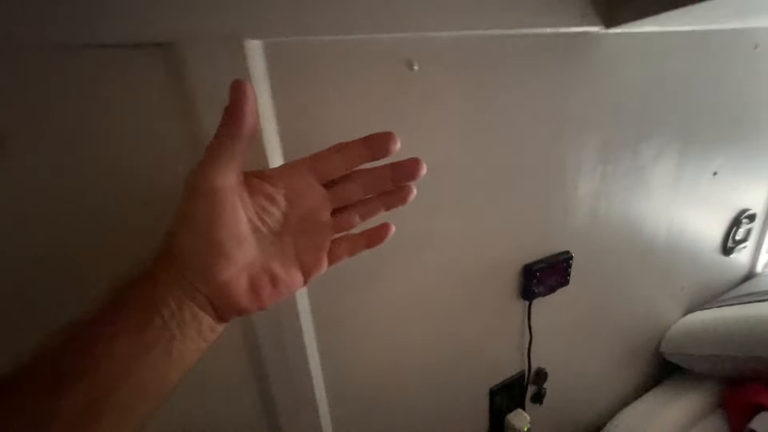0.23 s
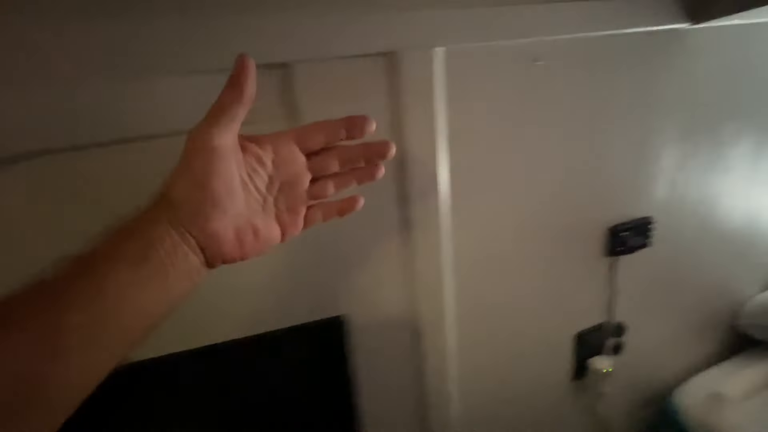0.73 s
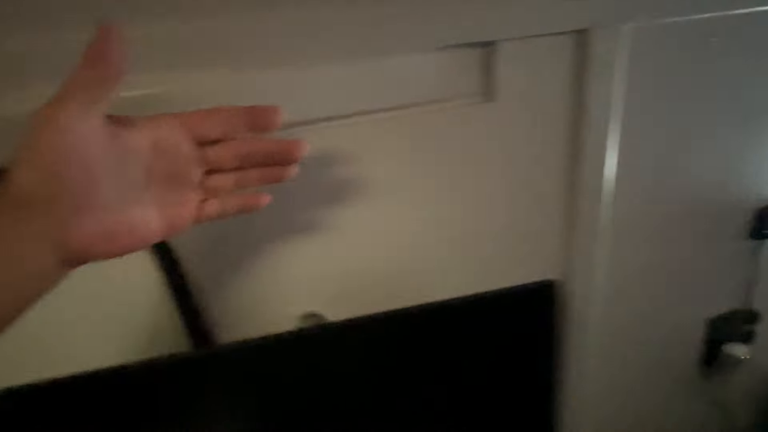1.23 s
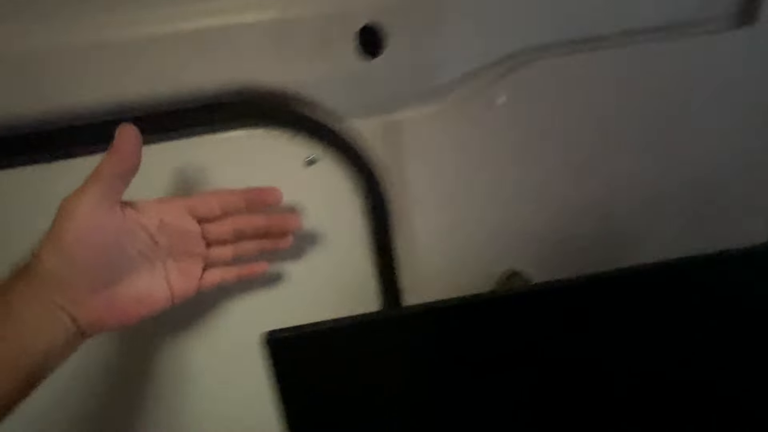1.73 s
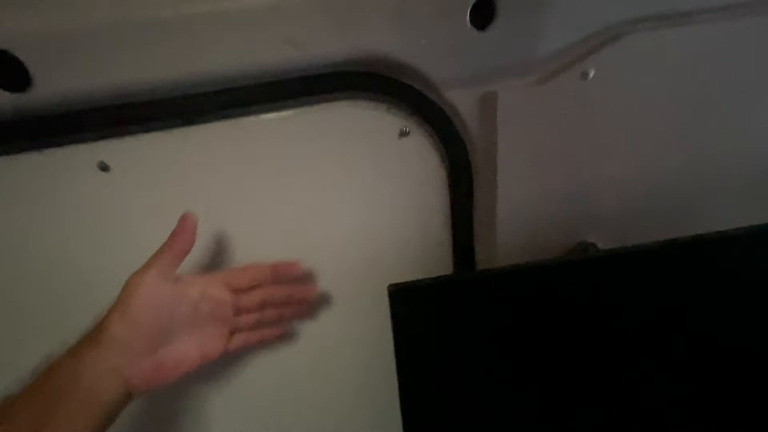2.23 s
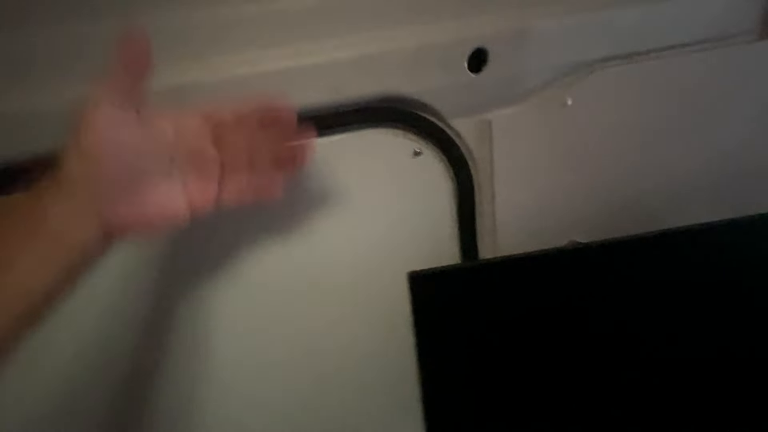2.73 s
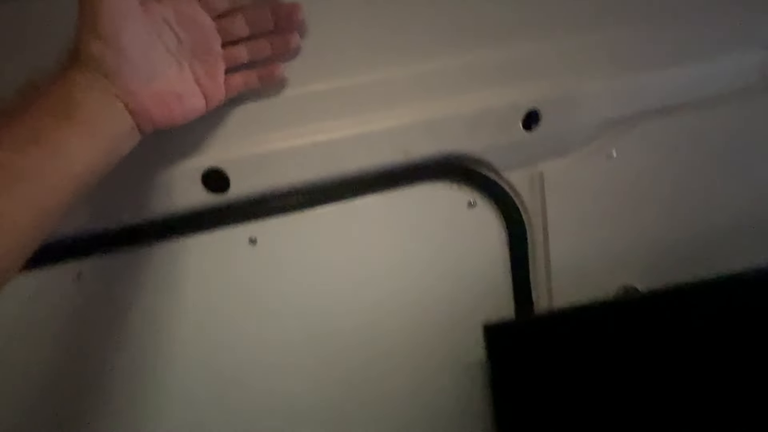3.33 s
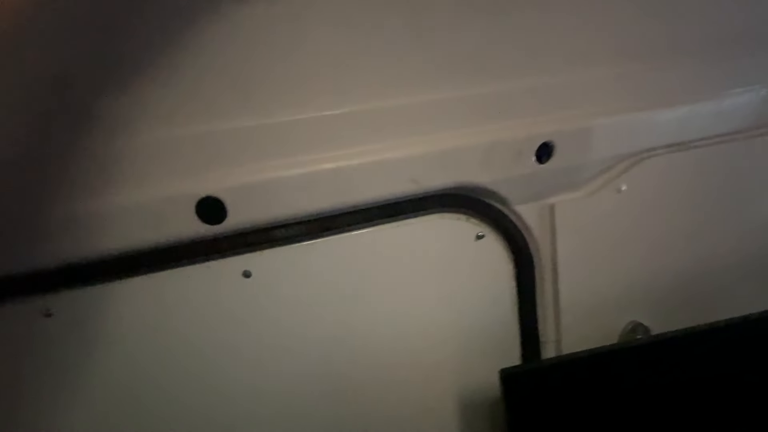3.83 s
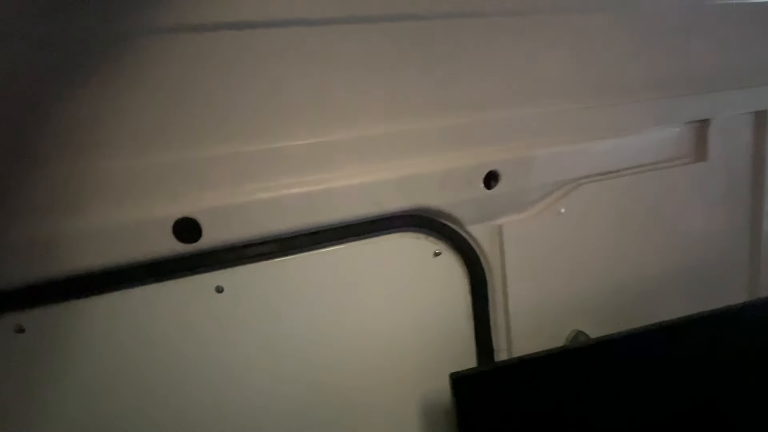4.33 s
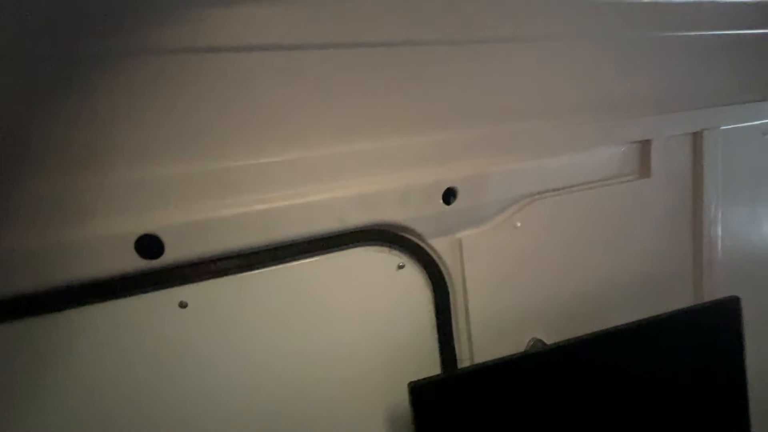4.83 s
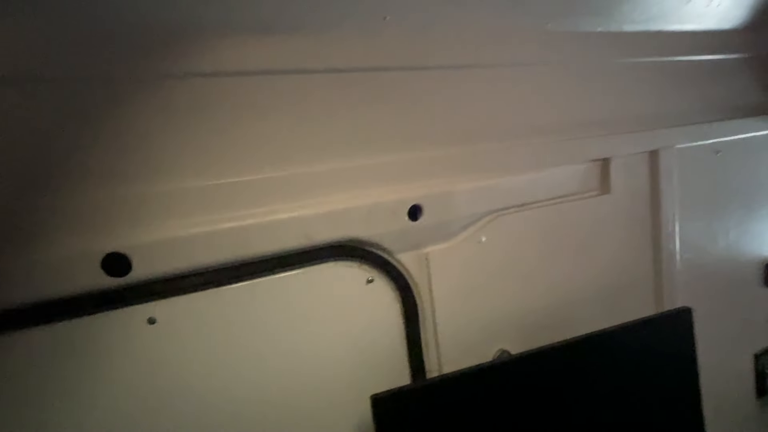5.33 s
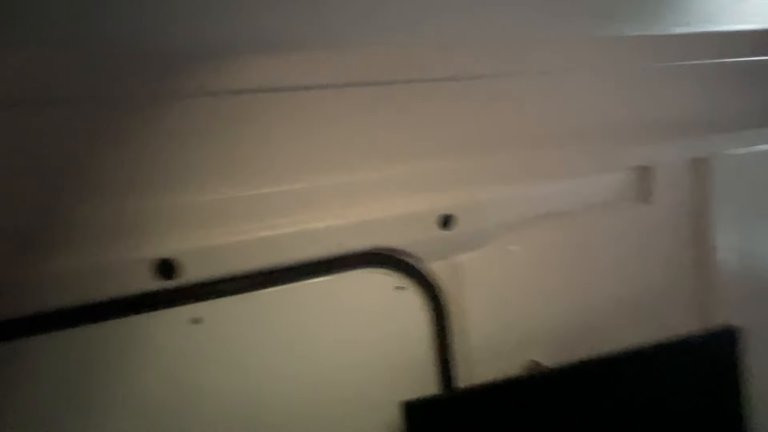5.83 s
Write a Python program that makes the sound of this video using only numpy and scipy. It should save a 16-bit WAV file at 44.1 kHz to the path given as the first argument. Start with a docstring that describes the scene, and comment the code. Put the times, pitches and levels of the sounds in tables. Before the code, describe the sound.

Inside a small hard-walled vehicle cabin, an air conditioner blows continuously with a low, slightly boxy rush. Beneath it a small engine outside throbs fast and deep, with wavering mains and compressor hum. A handheld microphone swings round over the first few seconds, so the hum changes color and shifts between sides. Brief soft cloth rubs come close by, clearest near one second.

```python
"""A small engine throbs outside a hard-walled cabin into which the air conditioner it powers blows.
The throb is a set of multiples of the firing rate, standing as clean tones that swell and shift sides
as the hand-held microphone turns. On top lie a low cabin boom (resonated noise), wavering mains, fan and
compressor tones, fan air (banded noise with wall echoes and resonances) and close cloth rustles (noise swells)."""
import sys
import numpy as np
from scipy import signal
from scipy.io import wavfile

SR = 44100
rng = np.random.default_rng(int(sys.argv[2]) if len(sys.argv) > 2 else 0)


def ratio(d):
    """dB to gain"""
    e = np.asarray(d, float) / 20
    return 10 ** e


def master_out(mix):
    """Clip the mix to full scale and print it as 16-bit PCM to the path in sys.argv[1]."""
    frames = np.transpose(np.atleast_2d(mix))
    ceiling = np.clip(frames, -1, 1)
    pcm = np.round(ceiling * 32767).astype(np.int16)
    wavfile.write(sys.argv[1], SR, pcm)


N = 267598
TIME = np.arange(N) / SR

# Microphone headings at which levels are given: 0 = start, 1 = sweeping, 2 = pausing, 3 = at rest.
HEADINGS = (0, 1, 2, 3)
# Stereo lean. Each row: frequency in Hz, left minus right in dB.
LEAN = [(60, -12), (130, 10.5), (270, -2.5), (590, 3.5), (1260, 2), (2680, 0.5), (5740, 11.5),
        (12300, -5.5)]


def rms_one(x):
    """Scale to unit rms."""
    return x / np.sqrt(np.mean(x ** 2) + 1e-20)


def at_hz(points, hz):
    """Read a spectrum table on a log-frequency axis."""
    table_hz, value = np.transpose(points)
    return np.interp(np.log(hz), np.log(table_hz + 1e-9), value)


def drift(rate_hz):
    """Slow random wander of spread 1: noise through two equal poles at rate_hz."""
    step = 40   # samples between drawn points
    r = np.exp(-2 * np.pi * rate_hz * step / SR)
    noise = rng.standard_normal(N // step + 2002)
    slow = signal.lfilter([1], [1, -2 * r, r * r], noise)[2000:]
    return np.interp(np.arange(N) / step, np.arange(len(slow)), rms_one(slow - slow.mean()))


def sides(pan_db):
    """Left and right gains for a level difference, left minus right."""
    return ratio(np.array([pan_db / 2, -pan_db / 2]))


def bands(low_hz, count):
    """Third-octave bands of stereo noise, each with its likeness and lean; yields centre and band."""
    # Each row: frequency in Hz, left-right likeness (1 = same, 0 = unrelated, -1 = inverted).
    likeness = [(60, 0.81), (170, -0.19), (500, -0.09), (1460, -0.12), (4240, -0.03), (12300, 0.041)]
    edges_hz = low_hz * 2 ** (np.arange(count + 1) / 3)
    white = rng.standard_normal((2, 2, N + 8192))   # neighbouring bands use different noise
    for k in range(count):
        sos = signal.butter(2, edges_hz[k:k + 2], "band", fs=SR, output="sos")
        mid, side = signal.sosfilt(sos, white[k % 2])[:, -N:]
        centre_hz = np.sqrt(edges_hz[k] * edges_hz[k + 1])
        alike = np.clip(at_hz(likeness, centre_hz), -.99, .99)
        pair = np.sqrt(1 + alike) * mid + np.sqrt(1 - alike) * side * [[1], [-1]]
        yield centre_hz, pair * sides(at_hz(LEAN, centre_hz))[:, None]


def engine(turn):
    """Regular firings heard as multiples of the firing rate; a wall resonance makes those above it lag."""
    # Each row: multiple of firing rate, rms dB at headings 0, 1, 2, left minus right dB at headings 0, 1, 2.
    orders = [(1, -67, -59, -49, -2, -2, 3), (3, -40, -31.5, -27, -3.5, 6.5, 1),
              (4, -31, -42.5, -46, -2.5, -11, 2), (5, -62, -46, -42.5, -9, 3, 17),
              (6, -32, -30.5, -34, 8.5, -2, -5.5), (7, -45.5, -29.5, -32, 18.5, -1, -6.5),
              (8, -53, -33.5, -36.5, 5, 4, -5), (9, -34.5, -43, -48.5, 4, -1, 16),
              (10, -67, -46, -49.5, 7, 4, -10), (11, -53, -47, -42, -27, 14, 3.5),
              (12, -57, -59, -65.5, -3, -11, -6), (13, -65, -57, -64.5, 5, -15, 2),
              (14, -57, -56, -57.5, 9, -15, 8), (15, -55, -55, -57.5, 2, -15, -12),
              (17, -53.5, -60.5, -64, 0, 5, 2), (18, -60, -52.5, -57.5, 0, 0, 1)]
    # Multiples heard on the far side of a pressure node, inverted.
    beyond_node = (5, 9, 10)
    # Second multiple: rms level in dB at headings 0-3.
    second_level_db = [-26, -28, -29, -27.5]
    # Second multiple: left minus right in dB at headings 0, 1, 2.
    second_pan_db = [-4, -4, -0.5]
    # Brief dips where the low boom and the second multiple partly cancel.
    # Each row: centre in seconds, depth in dB (negative = rise), half length in seconds.
    cancellations = [(.25, -0.5, 0.084), (1.054, 8, 0.092), (1.696, 12, 0.097), (2.04, 29, .05),
                     (2.6, 16, 0.3), (2.92, -1, .04), (3.158, 8, .04), (3.337, 25, 0.071), (3.652, 12, .06),
                     (4.357, 24, 0.19), (4.87, 20, .05), (5.287, 6, 0.2), (5.77, 8, 0.1)]
    firings_per_s, first_firing_s = 24.25, .0183
    wall_hz, wall_width_hz = 74.7, 31

    angle = 2 * np.pi * firings_per_s * (TIME - first_firing_s)
    angle = angle + 0.099 * drift(1.44)   # the governor hunts a little
    cancelled_db = sum(db * np.exp(-((TIME - s) / half_s) ** 2) for s, db, half_s in cancellations)
    second_db = np.interp(turn, HEADINGS, second_level_db) - cancelled_db
    second_sides = sides(np.interp(turn, [0, 1, 2], second_pan_db))
    out = -np.sqrt(2) * ratio(second_db) * np.cos(2 * angle) * second_sides

    effort_db = 0.62 * drift(17)   # firings differ a little in strength
    for k, *heard in orders:
        hz = k * firings_per_s
        height = np.interp(turn, [0, 1, 2], ratio(np.array(heard[:3])))
        height = height * ratio(effort_db + 0.89 * drift(7.6))
        lag_rad = np.arctan2(wall_width_hz * hz, wall_hz ** 2 - hz ** 2) + np.pi * (k in beyond_node)
        # the two ports sit at different points of the wave
        apart_rad = np.array([[.1], [-.1]]) * (1 + .5 * drift(0.33))
        tone = np.sqrt(2) * height * np.cos(k * angle - lag_rad + apart_rad)
        out += tone * sides(np.interp(turn, [0, 1, 2], heard[3:]))
    return out


def rumble():
    """Air turbulence booms in a low cabin resonance, alike at both ports but for level."""
    boom_hz, width_hz, level_db = 45.7, 3.4, -44
    r, w = np.exp(-np.pi * width_hz / SR), 2 * np.pi * boom_hz / SR
    boom = rng.standard_normal(N + SR)
    for _ in range(2):
        boom = signal.lfilter([1, 0, -1], [1, -2 * r * np.cos(w), r * r], boom)
    return ratio(level_db) * rms_one(boom[SR:]) * sides(-1.5)[:, None]


def motors(turn):
    """Motor, mains and fan tones that waver in level and phase; the high ones reach the ports out of step."""
    # Tone frequencies in Hz.
    tones_hz = [57.6, 60.01, 104.4, 120.03, 208.7, 391.0, 782.2, 2997, 3055, 6052, 6110, 6168]
    # Each row, one per tone: rms dB at headings 0-3, waver in dB, phase jitter in rad.
    tones = [(-47, -46, -46.5, -43.5, 7.2, 0.26), (-66, -53, -58, -56, 2.0, 0.083),
             (-36, -49.5, -43.5, -42, 4.7, 0.081), (-46, -45, -42.5, -42.5, 1.9, 0.1),
             (-53, -51.5, -49.5, -50, 2.7, 0.14), (-55.5, -52.5, -52, -50, 2.7, 0.74),
             (-57, -51, -49, -52, 3.0, 1.2), (-79, -77, -80, -66, 3.0, 2.7),
             (-61, -61.5, -62, -61, 2.2, 1.26), (-78, -79, -81, -81, 2.6, 2.2),
             (-77, -73, -76, -80, 3.0, 2.3), (-72, -80, -82, -69, 3.0, 2.5)]
    port_lead_s = np.array([[0], [.0003]])   # right ahead of left
    out = np.zeros((2, N))
    for hz, (*heard_db, waver_db, jitter_rad) in zip(tones_hz, tones):
        level_db = np.interp(turn, HEADINGS, heard_db) + waver_db * drift(5.1)
        angle = 2 * np.pi * (hz * (TIME + port_lead_s) + rng.random()) + jitter_rad * drift(3.05)
        out += np.sqrt(2) * ratio(level_db) * np.cos(angle) * sides(at_hz(LEAN, hz))[:, None]
    return out


def cabin(x, turn):
    """One source reaches each port by dense wall echoes, another set at every heading; they comb the spectrum."""
    t60_s = 0.11
    age_s = np.arange(SR // 4) / SR
    echoes = rng.standard_normal((4, 2, len(age_s))) * ratio(-60 * age_s / t60_s)
    out = 0
    for heading, pair in zip(HEADINGS, echoes):
        near = np.cos(np.pi / 2 * np.clip(turn - heading, -1, 1))
        pair = pair / np.sqrt(np.sum(pair ** 2, axis=1, keepdims=True))
        out = out + near * signal.oaconvolve(x[None], pair, axes=1)[:, len(x) - N:len(x)]
    return out


def air(turn):
    """Turbulent fan noise, slightly patchy; the resonances stand out more or less with the heading."""
    # Spectrum shape. Each row: frequency in Hz, relative density in dB per Hz.
    spectrum = [(30, -50), (50, -25.5), (65, -26), (90, -32), (160, -18.5), (250, -9), (300, -14.5),
                (500, -12), (600, -13.5), (750, -11.5), (1200, -13), (2300, -25.5), (3000, -24.5),
                (4200, -30.5), (8000, -32.5), (13000, -41.5)]
    # Duct and cabin resonances. Each row: frequency in Hz, width in Hz, lift in dB at headings 0-3.
    resonances = [(241, 37, 2, 7.5, 9, 7), (375, 44, 2.5, -1, 1, 7.5), (433, 34, -0.5, 5.5, 2.5, -0.5),
                  (500, 34, 8, 7.5, 5.5, 4), (711, 48, 7, 8, 4.5, 10), (956, 86, 2.5, 3.5, 1, 1.5),
                  (1094, 120, -1, 3.5, 1, -4), (1650, 250, 0, 4, 1.5, 5), (1970, 190, 8, 2, 3.5, 0.5),
                  (3030, 430, 2, 3, 1, 2), (6200, 220, 0, -2, 2, 0), (10700, 1900, 1, 1, 2, 4)]
    # Air level in dB at headings 0-3.
    air_level_db = [-36.5, -36.5, -36, -35]
    cabin_share = 0.58   # power share of the middle band that comes by the walls

    together = drift(0.94)
    out = 0
    for hz, band in bands(29.88, count=27):
        band_db = at_hz(spectrum, hz) + 0.43 * together + .5 * drift(3.6) + 0.93 * drift(11.4)
        out = out + ratio(band_db) * band

    middle = signal.sosfilt(signal.butter(2, [330, 2600], "band", fs=SR, output="sos"), out)
    source = np.r_[middle[1, -SR // 4:], middle[1]]   # the fan was already running
    out = out + (np.sqrt(1 - cabin_share) - 1) * middle + np.sqrt(cabin_share) * cabin(source, turn)

    for hz, width_hz, *lift_db in resonances:
        r, w = np.exp(-np.pi * width_hz / SR), 2 * np.pi * hz / SR
        peak = signal.lfilter([(1 - r * r) / 2, 0, (r * r - 1) / 2], [1, -2 * r * np.cos(w), r * r], out)
        gain = ratio(np.interp(turn, HEADINGS, lift_db) + 0.44 * drift(3.7))
        out = out + (gain - 1) * peak
    return ratio(np.interp(turn, HEADINGS, air_level_db)) * rms_one(out)


def rustles():
    """Cloth rubs close by: short swells of grainy noise, each tilted by its brightness."""
    # Each row: peak in seconds, relative level in dB, rise in seconds, brightness in dB per octave about 6 kHz.
    swell_rows = [(.62, -64.5, 0.064, 5), (.84, -55, 0.034, 1), (1.135, -47, 0.022, -2.5),
                  (1.57, -70, .02, 1.5), (1.72, -62, 0.024, 4), (2.385, -52, .014, -3.5),
                  (2.63, -56, 0.016, -5.5), (2.98, -55.5, 0.014, 1), (3.21, -56.5, 0.041, -0.5),
                  (3.49, -61.5, 0.033, 3), (4.42, -61, 0.031, -0.5), (4.97, -68, .03, 8),
                  (5.57, -58, .014, -1), (6.06, -52.5, 0.13, -2.5)]
    # Rubbing spectrum. Each row: frequency in Hz, relative density in dB per Hz.
    cloth = [(2000, -1.5), (3200, 1.5), (4400, 4), (5200, 1), (8000, 5), (11000, 4), (13000, -24)]
    fall_per_rise = 2.03   # a rustle fades slower than it comes

    grain = ratio(2.0 * drift(33) + 0.99 * drift(150))
    swells = []
    for peak_s, db, rise_s, _ in swell_rows:
        span_s = np.where(TIME < peak_s, rise_s, fall_per_rise * rise_s)
        swells.append(ratio(db) * np.exp(-np.abs((TIME - peak_s) / span_s) ** 1.27))
    out = 0
    for hz, band in bands(1895, count=9):
        tilts = [ratio(row[3] * np.log2(hz / 6000)) for row in swell_rows]
        band_db = at_hz(cloth, hz) + 7.5 + 1.75 * drift(33)
        out = out + ratio(band_db) * np.dot(tilts, swells) * band
    return grain * out


def scene():
    """Engine throb, cabin boom, motor tones, air and rustles."""
    # Microphone turn. Each row: time in seconds, heading (0-3).
    turn_rows = [(0, 0), (.45, 0.34), (.85, 0.58), (1.1, 0.84), (1.5, 1), (2, 1.57), (2.5, 2), (3.1, 2),
                 (3.7, 2), (4.3, 2.5), (5, 3)]
    turn_s, heading = np.transpose(turn_rows)
    turn = np.clip(np.interp(TIME, turn_s, heading), 0, 3)
    return engine(turn) + rumble() + motors(turn) + air(turn) + rustles()


def low_pass(x):
    """Removes everything above the highest recorded frequency."""
    return signal.sosfilt(signal.butter(12, 12880, fs=SR, output="sos"), x)


def record(dry):
    """The centre image dips near 10 kHz, the topmost treble narrows and rolls off."""
    mid, side = (dry[0] + dry[1]) / 2, (dry[0] - dry[1]) / 2
    notched = signal.sosfilt(signal.butter(2, [9500, 10800], "bandstop", fs=SR, output="sos"), mid)
    mid = notched + ratio(-10.5) * (mid - notched)
    mid = signal.sosfilt(signal.butter(4, 12000, fs=SR, output="sos"), mid)
    side = signal.sosfilt(signal.butter(6, 11700, fs=SR, output="sos"), side)
    return low_pass(np.array([mid + side, mid - side]))


dry = scene()
out = record(dry)
master_out(out)
```